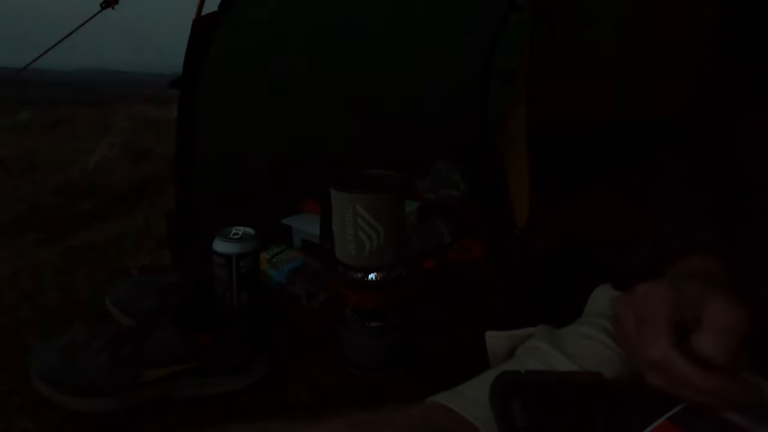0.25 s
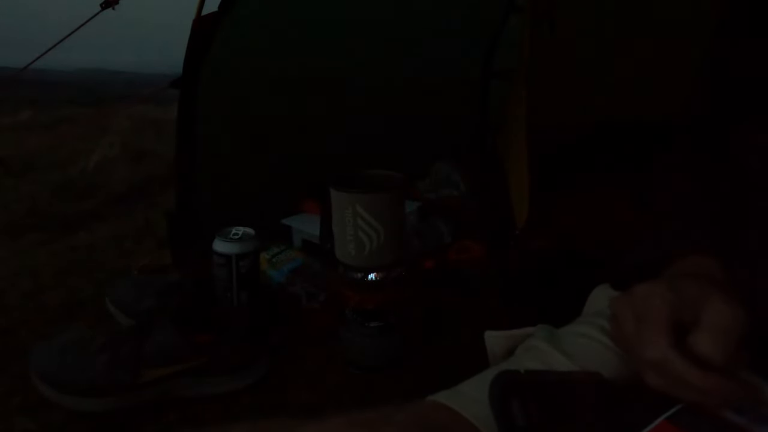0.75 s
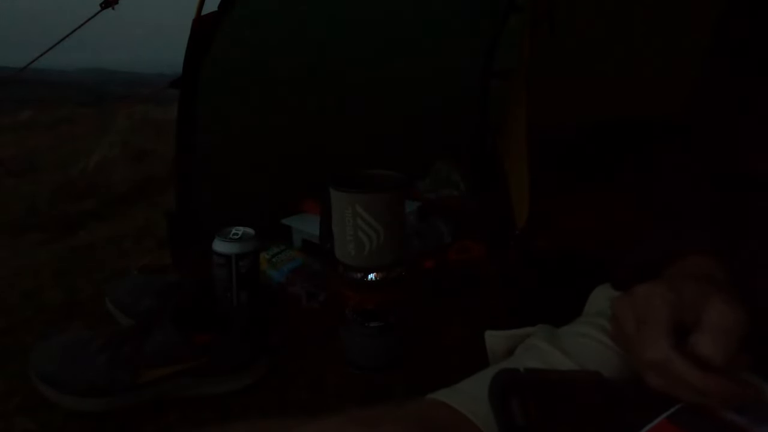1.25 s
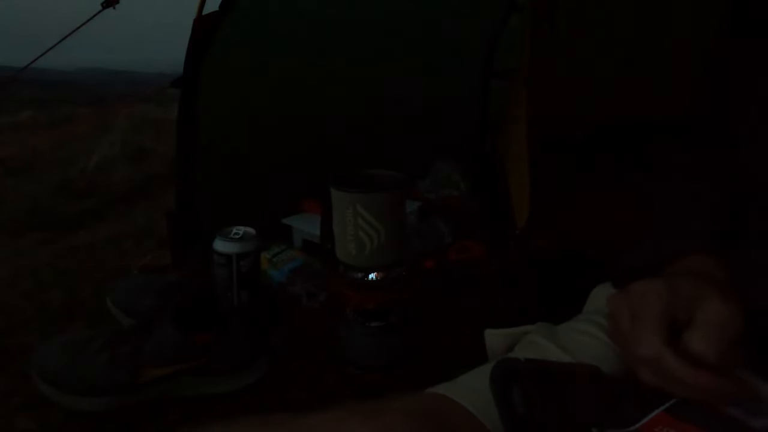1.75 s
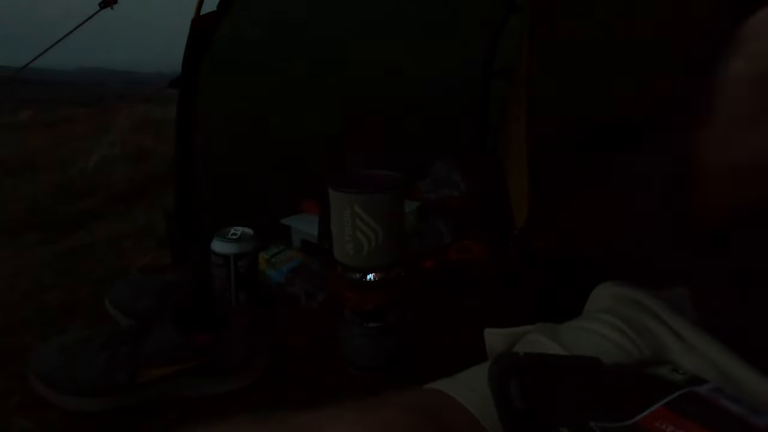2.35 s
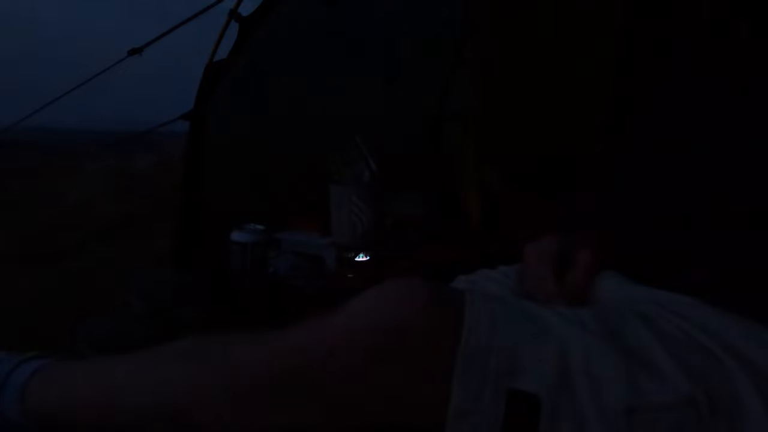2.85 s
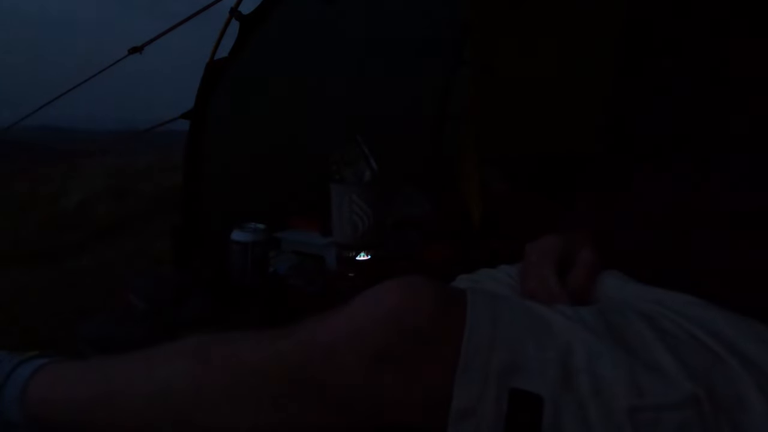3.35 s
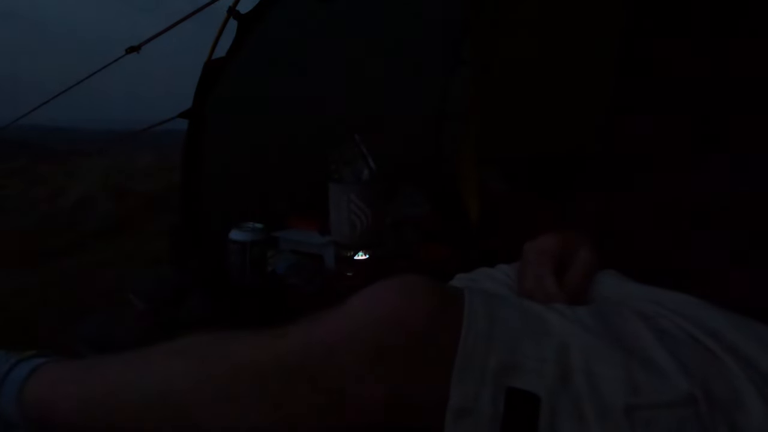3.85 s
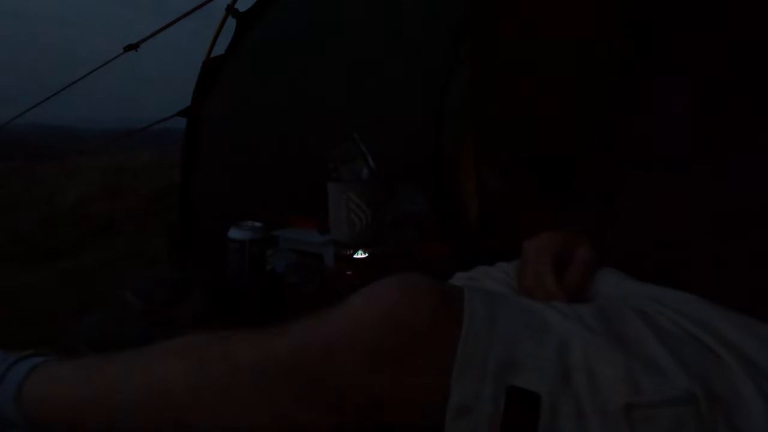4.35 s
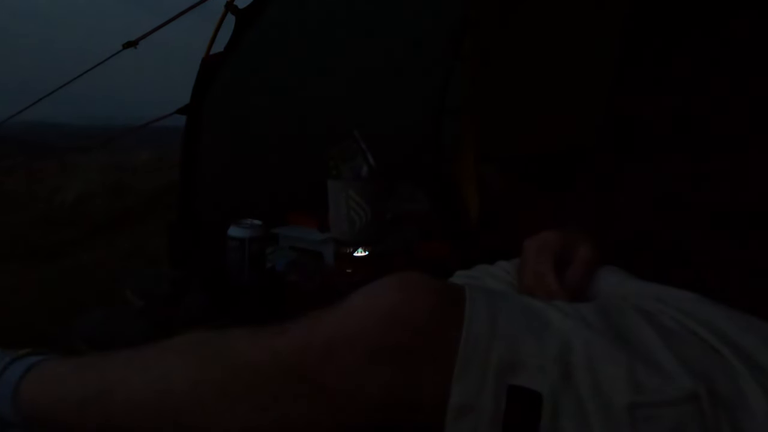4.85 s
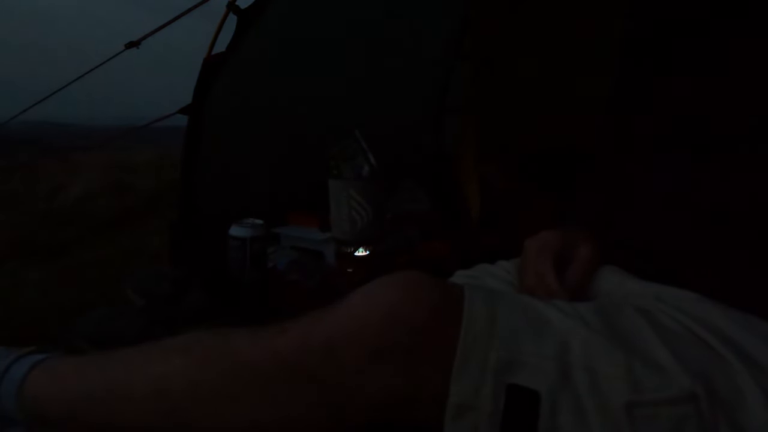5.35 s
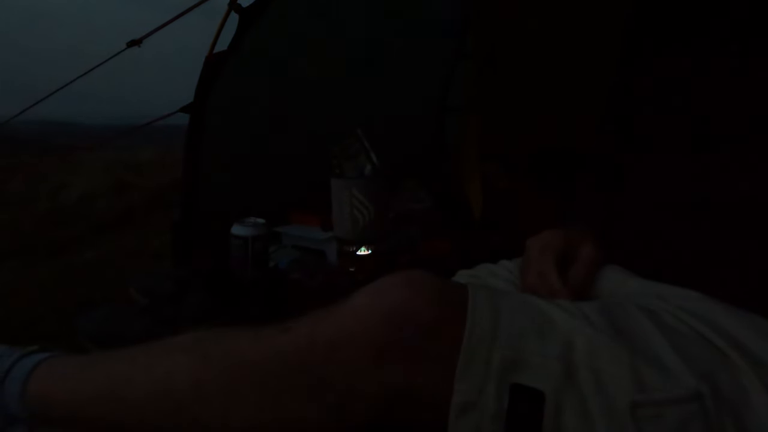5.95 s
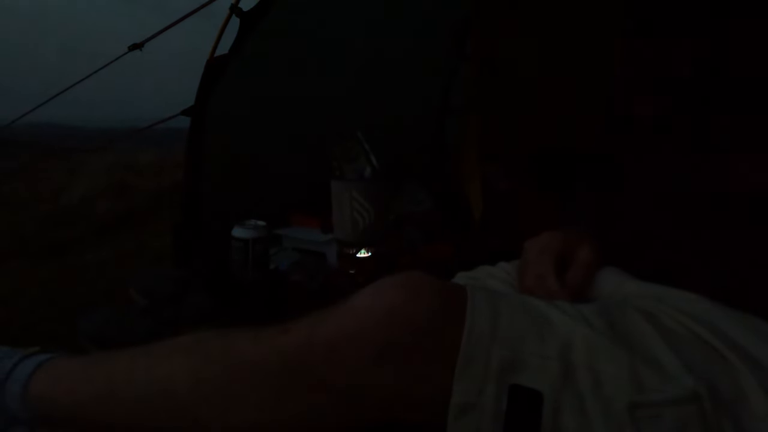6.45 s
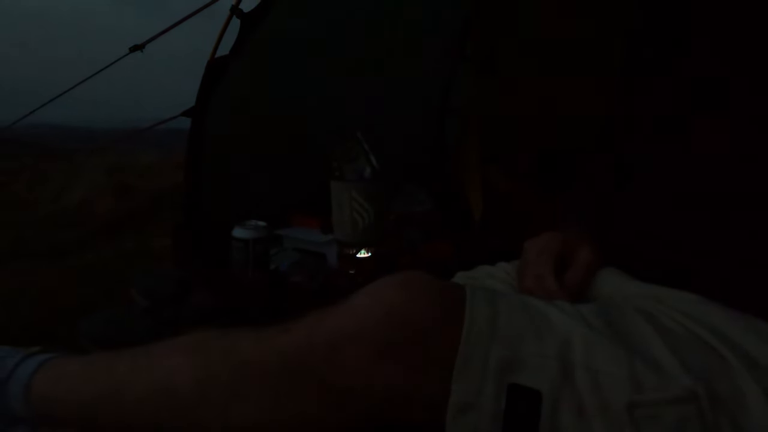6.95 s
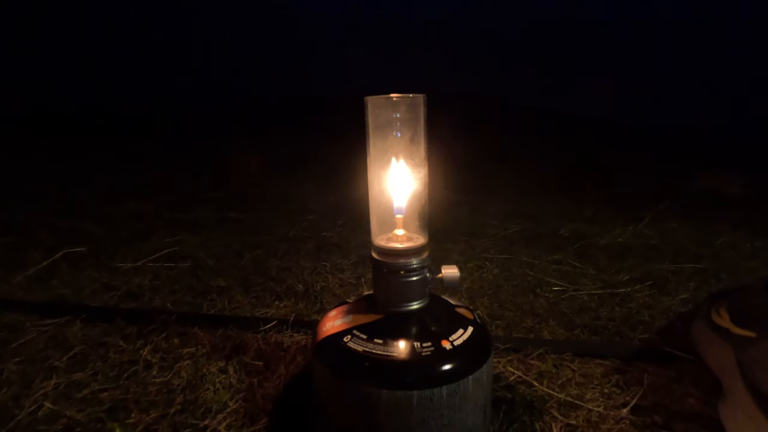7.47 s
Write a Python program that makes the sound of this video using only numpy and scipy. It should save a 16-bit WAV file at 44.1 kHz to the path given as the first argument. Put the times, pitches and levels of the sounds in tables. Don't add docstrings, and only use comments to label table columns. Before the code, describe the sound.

From 0 to about 2.55 s a gas stove at full flame roars and hisses loudly and steadily, close and slightly right, growing about one decibel louder. A low wind bump on the microphone opens it, with another moderate one near 2.1 s. The sound stops dead, leaving a moment of silence until about 2.7 s. A much quieter low flame fades in by 2.8 s: thin soft hiss, weak low roar, and a simmering patter. Small hollow bubble knocks hit the pot floor irregularly, clearer at 3.47, 4.5, 6.05 and 7.19 s, among dry metal and cloth ticks. Breeze puffs rumble, strongest around 3.9 to 4.1 s, with dull tent flaps; the stereo image gradually widens. At 7.25 s a cut to open air leaves only low wind, swelling in soft pushes up to about 7.7 s, over very faint microphone noise.

```python
import sys
import numpy as np
from scipy import signal
from scipy.fft import rfft, irfft
from scipy.io import wavfile
from scipy.ndimage import uniform_filter1d

SR = 44100
rng = np.random.default_rng(int(sys.argv[2]) if len(sys.argv) > 2 else 0)


def materialize(psi):
    bounded = np.clip(np.atleast_2d(psi).T, -1, 1)
    quanta = np.round(bounded * 32767).astype(np.int16)
    wavfile.write(sys.argv[1], SR, quanta)


def to_linear_factor(level_db):
    exponent = np.asarray(level_db, float) / 20
    return 10 ** exponent


N = 339999
T = np.arange(N) / SR
HZ = np.fft.rfftfreq(N + 1, 1 / SR)
LULL_DB = -70.5

# full flame ends, fade-in starts, fade-in ends, open air starts [t/s]
CUTS_S = (2.555, 2.69, 2.808, 7.255)
# [f/Hz, density/dB per Hz]
BREEZE_SPECTRUM = [(8, -3), (25, 0), (45, -7), (62, -15), (85, -25), (125, -36), (400, -120)]
# [f/Hz, width/Hz, gain/dB]
LOW_ECHO_COMB = [(2350, 200, -4), (3360, 90, -4.5), (3490, 90, 2.5), (3620, 130, 1), (3830, 130, -1.5),
                 (4210, 80, -3), (4850, 200, -1.2), (5770, 90, -3.5), (6380, 110, 1.5), (6690, 100, -1.5),
                 (6850, 90, 1), (7110, 110, -2.5), (7250, 100, 1.5)]
# [t/s, peak level/dB, pot ring f/Hz, overtone/dB]
BIG_BUBBLES = [(2.985, -44, 875, -10), (3.013, -38.5, 850, -14), (3.1548, -42.5, 950, -14),
               (3.364, -43, 950, -4), (3.466, -34, 956, -9), (3.652, -42.5, 860, -10),
               (3.836, -37.5, 860, -25), (4.503, -35.5, 940, -12), (4.562, -42, 915, -20),
               (4.61, -37.5, 850, -23), (4.713, -39.5, 930, -8), (4.73, -40, 840, -14),
               (4.951, -41, 890, -18), (5.137, -39, 830, -24), (5.278, -42, 970, -9),
               (5.343, -40.5, 890, -19.5), (5.367, -41, 820, -10), (5.526, -45, 865, -8),
               (5.678, -39, 880, -20), (5.705, -43, 930, -9.5), (5.971, -40, 955, -19),
               (6.026, -44, 907, -27), (6.0477, -27.5, 980, -24), (6.279, -40.5, 960, -7),
               (6.305, -45, 960, -12), (6.721, -37, 930, -27), (7.1132, -36.5, 1020, -3.5),
               (7.1878, -29, 985, -18), (7.247, -38.5, 880, -8)]
# [t/s, peak level/dB, pot ring f/Hz]
SMALL_BUBBLES = [(7.083, -47, 960), (3.139, -51, 905), (3.252, -45, 890), (3.433, -45, 930),
                 (3.805, -44.5, 885), (3.99, -46.5, 815), (4.021, -49, 980), (4.084, -49, 770),
                 (4.179, -48, 845), (4.286, -52, 837), (4.488, -46, 880), (4.689, -46, 869),
                 (4.861, -45, 840), (4.988, -46, 980), (5.005, -49, 980), (5.323, -50, 947),
                 (5.458, -45, 1010), (5.561, -44.5, 940), (5.642, -46, 816), (5.836, -43.5, 920),
                 (5.876, -46, 920), (5.923, -45, 1000), (6.006, -46, 900), (6.433, -50, 894),
                 (6.582, -46, 885), (6.972, -44.5, 935), (6.986, -44, 1030), (7.002, -45, 910),
                 (7.066, -49, 1050), (7.236, -44, 953)]


def along(table, column=1):
    rows = np.array(table)
    return np.interp(T, rows[:, 0], rows[:, column])


def across(table, hz):
    rows = np.array(table)
    return np.interp(np.log(hz + 1), np.log(rows[:, 0] + 1), rows[:, 1])


def filtered(x, gain):
    return irfft(rfft(x, N + 1) * gain, N + 1)[:N]


def walk(rate_hz, count):
    size = max(int(SR / rate_hz), 1)
    steps = np.repeat(rng.standard_normal((count, N // size + 1)), size, axis=1)[:, :N]
    smooth = uniform_filter1d(uniform_filter1d(steps, size), size)
    return smooth / smooth.std()


def colour(x, spectrum):
    y = filtered(x, to_linear_factor(across(spectrum, HZ)) * (HZ > 0))
    return y / y.std()


def turbulence(spectrum, swell_db, swell_hz, flicker_db, flicker_hz, count=6):
    bins = rfft(rng.standard_normal(N + 1)) * to_linear_factor(across(spectrum, HZ)) * (HZ > 0)
    low, high = np.log(spectrum[0][0]), np.log(spectrum[-1][0])
    place = np.clip((np.log(HZ + 1) - low) / (high - low), 0, 1) * (count - 1)
    level_db = swell_db * walk(swell_hz, 1) + flicker_db * walk(flicker_hz, count)
    y = np.zeros(N)
    for k in range(count):
        band = np.clip(1 - abs(place - k), 0, 1)
        y += to_linear_factor(level_db[k]) * irfft(bins * band, N + 1)[:N]
    return y / y.std()


def ring(x, modes):
    lift_db = sum(db / (1 + (2 * (HZ - f) / width) ** 2) for f, width, db in modes)
    y = filtered(x, to_linear_factor(lift_db))
    return y * x.std() / y.std()


def warming(x, modes, change, start_s, end_s):
    warm = np.clip((T - start_s) / (end_s - start_s), 0, 1) - 0.5
    cold = ring(x, modes + [(f, width, -db) for f, width, db in change])
    hot = ring(x, modes + [(f, width, db) for f, width, db in change])
    return (cold + hot) / 2 + warm * (hot - cold)


def gusts(table):
    s, db, fade_s = np.transpose(table)[:, :, None]
    u = (T[::64] - s) / fade_s
    swell = to_linear_factor(db) * np.exp(np.minimum(-u, u / 0.5))
    return to_linear_factor(LULL_DB) + np.interp(T, T[::64], swell.max(axis=0))


def blips(times_s, db, hz, ring_ms, rise):
    t = np.arange(512) / SR
    u = t / (ring_ms[:, None] / 1000)
    envelope = (u / rise) ** rise * np.exp(rise - u)
    tones = to_linear_factor(db)[:, None] * envelope * np.sin(2 * np.pi * hz[:, None] * t)
    out = np.zeros(N + 512)
    np.add.at(out, (times_s * SR).astype(int)[:, None] + np.arange(512), tones)
    return out[:N]


def full_flame():
    # [f/Hz, density/dB per Hz]
    roar_spectrum = [(35, -31.5), (60, -12), (163, -2.5), (215, -1), (344, -4), (404, -6), (534, -17.5),
                     (782, -4), (960, -10.5), (1230, -8), (1580, -14), (2000, -16), (2600, -54.5),
                     (4400, -120)]
    jet_spectrum = [(1200, -45), (1850, -16), (2050, -6.4), (2250, 0.0), (3000, -0.8), (5100, -2.6),
                    (5600, -4.8), (6900, -8.5), (7800, -15.0), (8700, -23.3), (9800, -19.4), (11000, -24.7),
                    (12300, -28.9), (14300, -39.7)]
    # [f/Hz, width/Hz, gain/dB]
    metal_rings = [(2400, 200, 1.4), (2750, 220, 1.7), (3100, 200, -1.0), (3720, 300, 3.9),
                   (4230, 130, 1.2), (4450, 150, -2.3), (4680, 250, 3.6), (5040, 150, 2.8),
                   (5350, 150, -3.1), (6350, 200, 0.7), (6600, 200, -1.1), (7350, 200, -3.3),
                   (9860, 300, 1.0), (13200, 200, -0.3)]
    echo_comb = [(1750, 150, 2), (1990, 100, -2.8), (2580, 80, -1), (3450, 70, -1), (3600, 150, 1.3),
                 (4080, 150, -1.5), (4230, 90, 1.2), (4640, 100, 1), (5040, 80, .8), (5500, 130, 1.5),
                 (6390, 80, 1.2), (6510, 130, -1.5), (6870, 130, 1.7), (7500, 130, 1)]
    warm_change = [(3700, 300, 1.5), (4680, 250, -1)]
    # [f/Hz, level/dB]
    balance = [(60, -1), (110, -0.5), (200, -0.5), (370, -0.5), (670, -1.5), (1230, -2.5), (2240, -1.0),
               (4110, -1.5), (7510, 0), (13700, 2.5)]
    # [f/Hz, phase/rad]
    phase = [(0, 0), (1700, -.12), (2400, -.45), (3500, -.6), (5200, -.42), (7000, -.3), (9000, -.05),
             (14000, 0)]
    # [f/Hz, correlation]
    likeness = [(60, .97), (300, .995), (1500, .98), (2000, .94), (2500, .975), (6500, .95), (8200, .8),
                (10000, .82), (11500, .85), (12400, .3), (14000, .6)]
    # [peak t/s, peak level/dB, fade/s]
    wind_gusts = [
        (.09, -45.5, .25),
        (.8, -58.5, 0.5),
        (1.62, -59, .5),
        (2.06, -51.5, .28),
    ]

    def burn():
        roar = turbulence(roar_spectrum, 0.12, 6.7, 0.62, 11.82)
        jet = turbulence(jet_spectrum, 0.27, 8.3, 0.38, 25.0)
        jet = warming(jet, metal_rings + echo_comb, warm_change, 0, CUTS_S[0])
        return to_linear_factor(-4.5) * roar + to_linear_factor(0.33) * jet

    alike = np.clip(across(likeness, HZ), 0.05, 0.999)
    tilt = to_linear_factor(across(balance, HZ) / 2) * np.exp(0.5j * across(phase, HZ))
    direct = rfft(burn(), N + 1)
    scattered = rfft(burn(), N + 1) * np.sqrt((1 - alike) / (1 + alike))
    ports = irfft([tilt * (direct + scattered), (direct - scattered) / tilt], N + 1)[:, :N]
    start_db, climb_db_per_s = -34, 0.42
    mid, side = (turbulence(BREEZE_SPECTRUM, 1.5, 11.0, 1.6, 4.8, count=2) for _ in range(2))
    rumble = mid + to_linear_factor(-11.5) * side * np.array([[1], [-1]])
    return ports * to_linear_factor(start_db + climb_db_per_s * T) + rumble * gusts(wind_gusts)


def low_flame():
    # [f/Hz, density/dB per Hz]
    roar_spectrum = [(60, -33), (120, -20.5), (142, -5.5), (190, -0.8), (290, -5), (395, -10.5),
                     (530, -25.5), (620, -47), (1300, -120)]
    jet_spectrum = [(1400, -35), (2400, -8.6), (2900, -4.6), (3500, 0), (4300, -10.2), (5200, -9.4),
                    (6100, -13), (6700, -20.3), (7500, -20.6), (8700, -26.6), (9400, -32), (11000, -60)]
    nozzle_spectrum = [(7000, -40), (9400, -11), (10400, -.5), (11900, 0), (12800, -4), (13500, -11),
                       (13800, -20), (14300, -32)]
    # [f/Hz, width/Hz, gain/dB]
    metal_rings = [(3229, 130, 3.2), (3488, 250, 1.4), (4048, 166, 5.6), (4478, 186, 3.8), (5124, 250, 3.9),
                   (6072, 250, 1.9), (6847, 158, 3.0), (7235, 184, 3.2), (7622, 135, 2.0), (9043, 133, 2.7),
                   (9388, 140, 2.6), (9776, 155, 3.6), (10422, 200, 4.7), (10766, 159, 4.2),
                   (11455, 250, 4.1), (11929, 235, 2.3), (12489, 250, 3.5)]
    nozzle_comb = [(8130, 100, 2), (9050, 90, 1.5), (9210, 110, -2), (9670, 130, 3), (10400, 150, 1.5),
                   (10570, 110, -3), (10770, 90, 1.5), (10930, 130, -3), (11190, 110, 2), (11780, 110, -3),
                   (12300, 90, 2), (13220, 110, 2.5), (13630, 150, 4)]
    warm_change = [(4900, 200, 2), (5400, 300, 3), (7700, 250, 1.5)]
    # [t/s, jet level/dB]
    valve = [(2.8, -60), (3.05, -57.5), (3.9, -61), (4.9, -61), (7.2, -59)]
    # [peak t/s, peak level/dB, fade/s]
    breeze_gusts = [(2.8, -50, .1), (2.93, -50, 0.065), (3.25, -49, 0.14), (3.56, -53, 0.11),
                    (3.74, -52, 0.12), (3.94, -42.5, .09), (4.13, -39.5, 0.067), (4.46, -45, 0.084),
                    (4.57, -47, .04), (4.78, -53, 0.087), (4.99, -49, .06), (5.17, -54, 0.13),
                    (5.45, -57, 0.088), (5.81, -62, 0.045), (6.27, -50, 0.045), (6.5, -57, .1),
                    (6.64, -47.5, .08), (6.78, -50, .1), (7.0, -61, .08), (7.17, -60, .08)]
    # [f/Hz, level/dB]
    side_spectrum = [(60, -23.5), (110, -26), (200, -39), (370, -27), (670, -30), (1230, -28.5),
                     (2240, -25), (4110, -21.5), (7510, -19.5), (13700, -5)]
    # [t/s, side gain/dB]
    widening = [(2.8, -14), (5.0, -10.5), (5.6, 2.5), (6.2, 4.5), (7.26, 10.5)]
    top_widening = [(2.8, -25.0), (3.3, -16), (3.6, 6), (7.26, -2)]
    # [f/Hz, density/dB per Hz]
    flap_spectrum = [(35, -30), (60, -5.5), (90, -0.5), (125, -3.5), (200, -41.5)]
    # [peak t/s, peak level/dB, fade/s]
    flaps = [(3.36, -63.5, 0.084), (3.8, -65.5, 0.11), (4.13, -59.5, .08), (6.07, -61.5, .12),
             (5.33, -67.5, .1), (6.58, -62, .05), (7.12, -58.5, .12)]
    since_s = T - CUTS_S[2]
    modes = metal_rings + LOW_ECHO_COMB + nozzle_comb

    def burn():
        valve_db = along(valve)
        roar = turbulence(roar_spectrum, 0.41, 10.0, 0.52, 24.0, count=3)
        roar *= to_linear_factor(valve_db + 5 - 0.66 * since_s)
        jet = turbulence(jet_spectrum, 0.9, 25.0, 1.3, 30.0, count=4) * to_linear_factor(valve_db + 0.73)
        nozzle = turbulence(nozzle_spectrum, 0.59, 17.0, 0.7, 30.0, count=2)
        nozzle *= to_linear_factor(-82 + 1.5 * since_s)
        hiss = warming(jet + nozzle, modes, warm_change, CUTS_S[2], CUTS_S[3])
        breeze = turbulence(BREEZE_SPECTRUM, 0.6, 4.3, 0.6, 4.3, count=2) * gusts(breeze_gusts)
        return roar + hiss + breeze

    knocks = pot()
    mid = burn() + knocks
    other = burn() - knocks
    below = 1 / (1 + (HZ / 11000) ** 16)
    side_gain = to_linear_factor(across(side_spectrum, HZ))
    lows = filtered(other, side_gain * below)
    top = filtered(other, side_gain * (1 - below))
    side = lows * to_linear_factor(along(widening)) + top * to_linear_factor(along(top_widening))
    cloth = colour(rng.standard_normal(N), flap_spectrum)
    mid += cloth * (gusts(flaps) - to_linear_factor(LULL_DB))
    return np.array([mid + side, mid - side])


def pot():
    # [t/s, peak level/dB, pot ring f/Hz]
    pips = [(2.825, -48, 875), (2.849, -50, 853), (2.866, -49, 877), (2.929, -49, 942), (2.973, -48, 800),
            (3.045, -48, 980), (3.129, -46, 800), (3.163, -49, 883), (3.453, -51, 850), (3.474, -49, 985),
            (3.508, -50, 891), (3.658, -48, 842), (3.69, -50, 842), (3.784, -48, 1020), (3.793, -49, 896),
            (3.874, -49, 966), (3.909, -50, 1070), (4.21, -49.5, 1000), (4.324, -48, 794),
            (4.479, -51, 931), (4.573, -49, 891), (4.7235, -49, 864), (4.7405, -43, 885), (4.766, -48, 818),
            (5.293, -50, 966), (5.358, -47, 842), (5.3825, -46, 929), (5.4965, -47, 837),
            (5.5385, -50, 907), (5.629, -48, 923), (5.657, -50, 869), (5.688, -47, 861), (5.7185, -46, 912),
            (5.7605, -49, 853), (5.8155, -49, 950), (5.826, -50, 947), (5.869, -50, 958), (5.884, -49, 934),
            (5.947, -50, 915), (5.9855, -47, 950), (5.992, -50, 966), (6.237, -51, 996), (6.258, -48, 804),
            (6.265, -48, 920), (6.293, -46, 829), (6.366, -50, 999), (6.381, -51, 921), (6.457, -49, 1010),
            (6.483, -50, 1010), (6.531, -51, 834), (6.635, -48.5, 918), (6.681, -51, 894),
            (6.7005, -48, 907), (7.1315, -50, 939), (7.2045, -48, 1050)]
    # [t/s, peak level/dB, f/Hz]
    ticks = [(2.852, -40, 3710), (3.0832, -41, 3190), (3.1787, -44, 3470), (3.3146, -43, 3470),
             (3.3444, -41, 3430), (3.3466, -41, 3300), (2.947, -43, 3400), (3.0628, -43, 3400),
             (3.3559, -36, 3120), (3.4653, -34.5, 2000), (3.5133, -41, 3400), (3.805, -43, 3220),
             (3.909, -44, 1790), (3.9821, -47, 3430), (4.1075, -36, 3400), (4.111, -38, 3300),
             (4.7165, -47, 1700), (4.7407, -43, 1800), (4.9864, -45, 3170), (5.2135, -46, 1950),
             (5.367, -42, 1950), (5.4433, -47, 3060), (5.443, -42, 1900), (5.5376, -46, 1580),
             (5.6836, -47, 3270), (5.7046, -44, 1940), (6.004, -43, 1980), (6.29, -46, 2700),
             (3.99, -48, 1650), (4.9875, -50, 1900), (3.32, -46, 1910), (3.345, -46, 1800),
             (3.3563, -47, 1800), (5.0038, -46, 1820), (5.5306, -46, 2040), (5.5592, -49, 1600),
             (7.126, -46, 1900), (7.2405, -45, 1960), (6.381, -42, 1900), (6.705, -43, 3400),
             (7.1125, -48, 3500)]
    # [t/s, peak level/dB, f/Hz]
    snaps = [
        (2.8293, -47, 5090),
        (3.5119, -41, 6070),
        (4.1081, -44, 5250),
        (5.3664, -56.5, 5100),
        (6.3814, -54, 5180),
    ]
    # [f/Hz, density/dB per Hz]
    patter_spectrum = [(310, -50), (520, -41), (593, -20), (756, -2.5), (921, -0.5), (1150, -9),
                       (1450, -15), (2030, -16.5), (2360, -29), (5500, -120)]
    simmer_spectrum = [(310, -50), (520, -39), (593, -18.5), (756, -2), (921, 0.5), (1450, -11.5),
                       (2030, -11), (2200, -12), (2320, -30), (2500, -29), (3250, -44), (5500, -120)]
    # [t/s, level/dB]
    boil = [(2.8, -55.5), (4.4, -58.5), (5.2, -58), (5.6, -57), (7.2, -58)]

    overtone_db = -13
    bubbles = BIG_BUBBLES + [row + (overtone_db,) for row in SMALL_BUBBLES + pips]
    s, db, hz, over_db = np.transpose(bubbles)
    ring_ms = 0.55 - 0.02 * (db + 39)
    knocks = -blips(s - 0.0008, db, hz, np.clip(1.75 * ring_ms, 0.2, 2), 2.2)
    knocks += blips(s, db + over_db + 3, 1.85 * hz, np.clip(0.71 * ring_ms, 0.1, 2), 0.77)

    s, db, hz = np.transpose(ticks)
    for late_s, echo_db in ((0, 0), (0.0037, -9)):
        knocks += blips(s + late_s, db - 1.5 + echo_db, hz, np.clip(1150 / hz, 0.1, 2), 1.3)
    s, db, hz = np.transpose(snaps)
    knocks += blips(s, db + 0.1, hz, np.clip(800 / hz, 0.03, 2), 1.1)

    when, size = rng.random((2500, 2)).T
    pulses = to_linear_factor(-3.5 * np.log(size + 0.06)) * rng.choice([-1, 1], len(when))
    patter = np.zeros(N)
    np.add.at(patter, (when * N).astype(int), pulses)
    burst_db = 2.7 * np.minimum(walk(18.0, 1)[0], 0.74)
    patter = colour(patter * to_linear_factor(burst_db + 6 * crowd()), patter_spectrum)
    seethe = turbulence(simmer_spectrum, 1.5, 14.0, 2.0, 30.0, count=4)
    water = to_linear_factor(along(boil)) * (to_linear_factor(-6.5) * patter + to_linear_factor(-4) * seethe)
    return ring(knocks, LOW_ECHO_COMB[:1]) + water


def crowd():
    s = np.array([row[0] for row in BIG_BUBBLES + SMALL_BUBBLES])[:, None]
    spread_s = 0.022
    return np.interp(T, T[::64], np.exp(-((T[::64] - s) / spread_s) ** 2).max(axis=0))


def open_air():
    # [f/Hz, density/dB per Hz]
    wind_spectrum = [(10, -20), (25, -12), (50, -8), (110, 0), (170, -5), (200, -14), (230, -24),
                     (265, -48), (330, -62), (600, -120)]
    noise_spectrum = [(180, -24), (300, -3), (376, -11.5), (670, -11), (726, -16), (1360, -16), (1470, -19),
                      (4540, -27), (7700, -30), (8800, -42), (14000, -50)]
    # [peak t/s, peak level/dB, fade/s]
    wind_gusts = [
        (7.3, -58, .08),
        (7.405, -50.5, .05),
        (7.56, -47.5, .15),
        (7.71, -45.5, 0.14),
    ]
    wind = turbulence(wind_spectrum, 0.4, 6.74, 0.8, 13.0, count=2) * gusts(wind_gusts)
    mid, side = (colour(rng.standard_normal(N), noise_spectrum) * to_linear_factor(-84.5) for _ in range(2))
    return wind + mid + to_linear_factor(-5.5) * side * np.array([[1], [-1]])


def scene():
    out_s, fade_s, full_s, open_s = CUTS_S
    fade = np.clip((T - fade_s) / (full_s - fade_s), 0, 1) ** 1.4
    full = full_flame() * (T < out_s)
    low = low_flame() * fade * (T < open_s)
    return full + low + open_air() * (T >= open_s)


def band_limit(x):
    return signal.sosfilt(signal.butter(12, 14420, fs=SR, output="sos"), x)


def record(dry):
    return band_limit(dry)


dry = scene()
out = record(dry)
materialize(out)
```